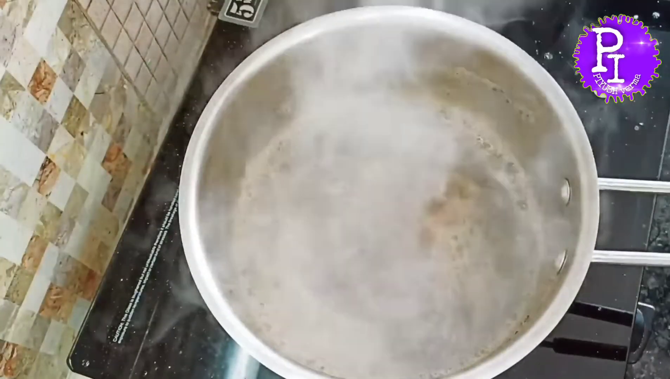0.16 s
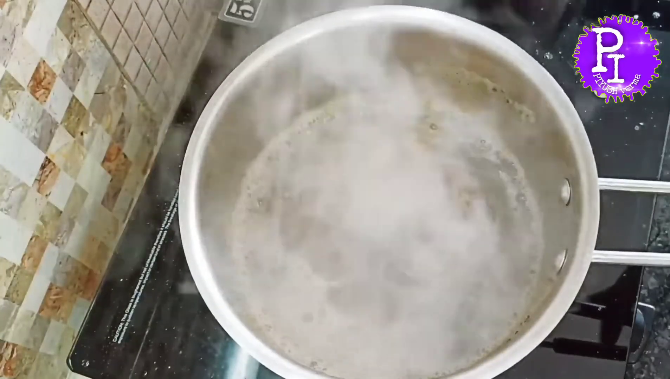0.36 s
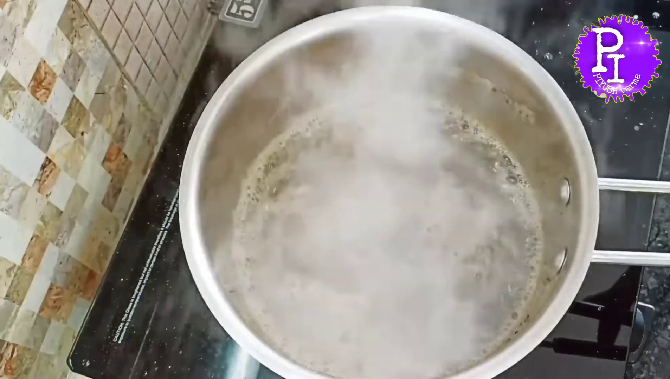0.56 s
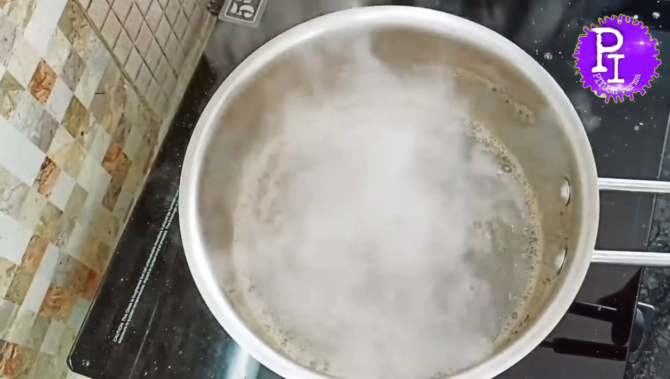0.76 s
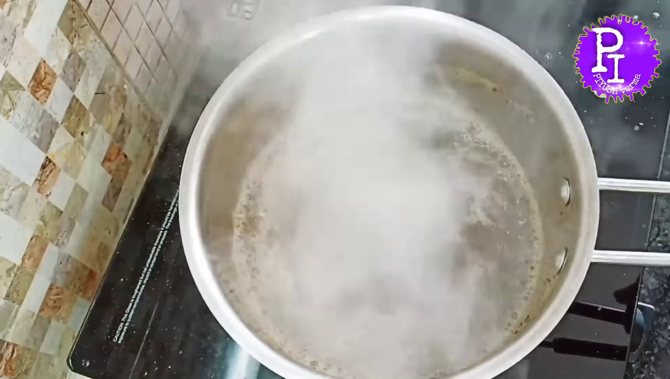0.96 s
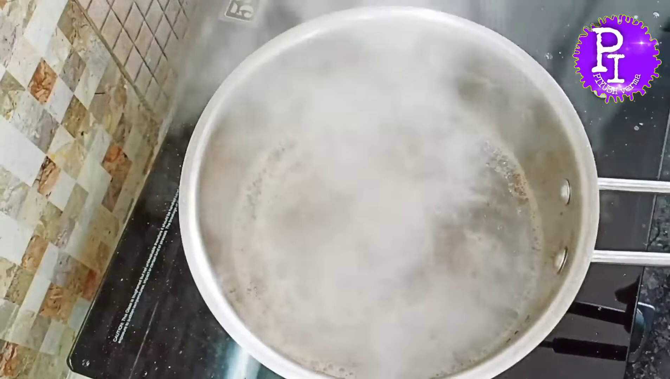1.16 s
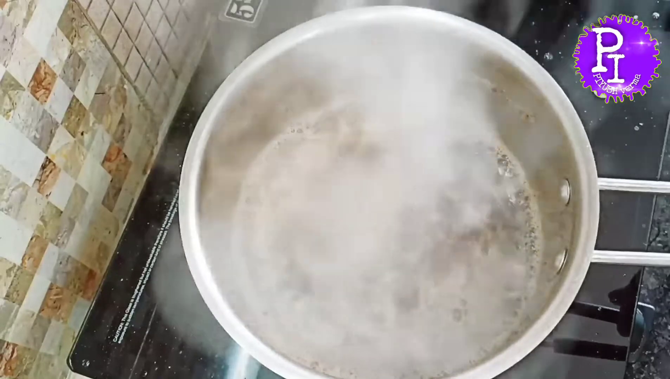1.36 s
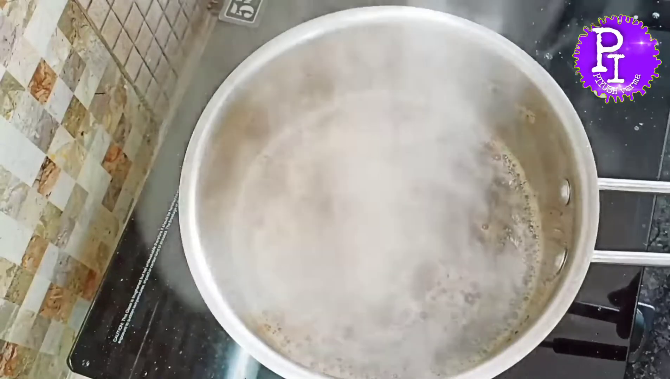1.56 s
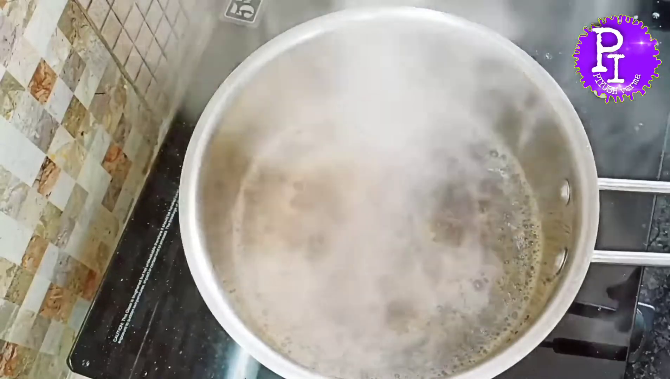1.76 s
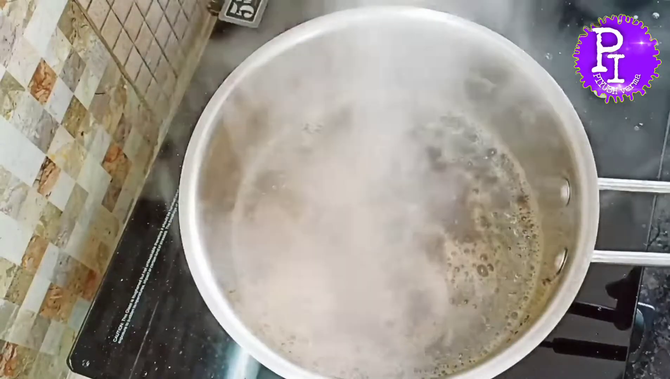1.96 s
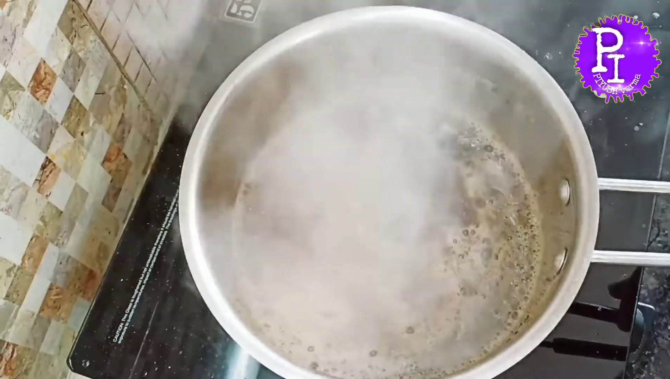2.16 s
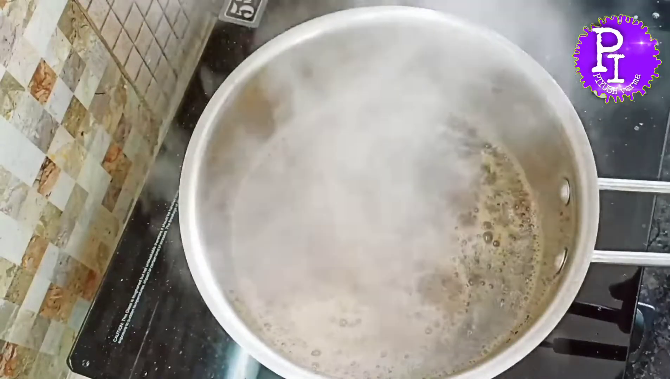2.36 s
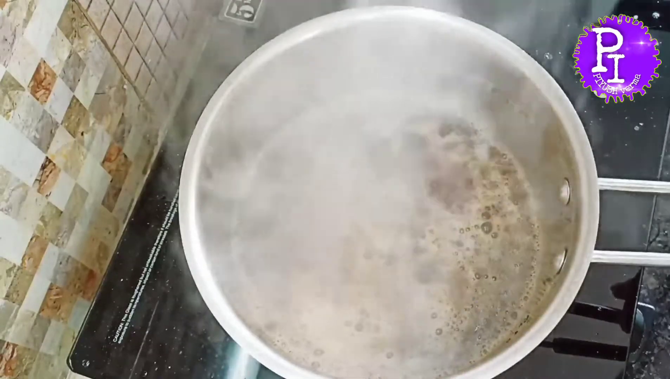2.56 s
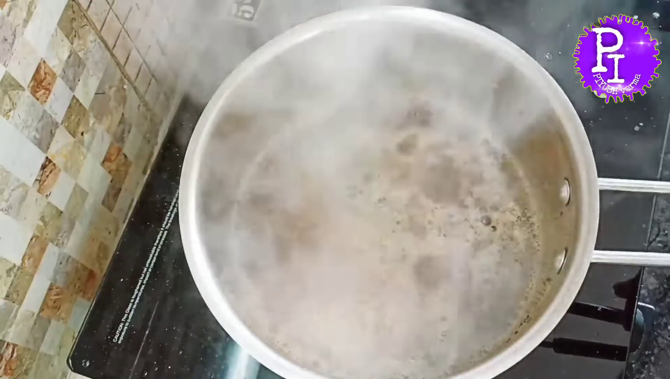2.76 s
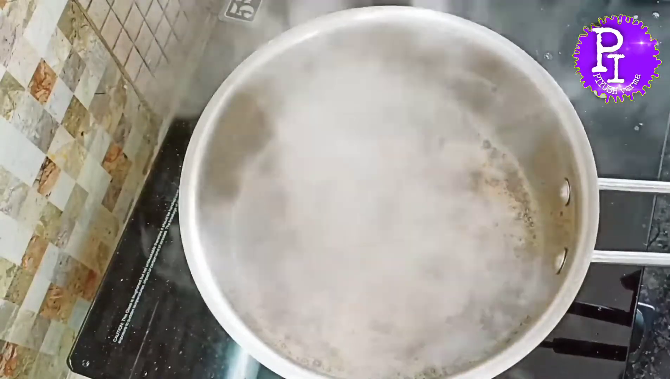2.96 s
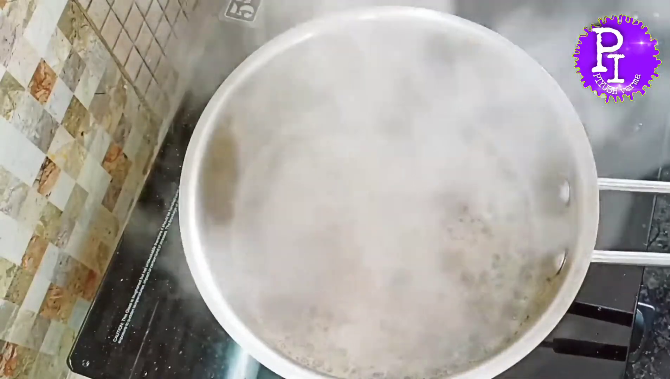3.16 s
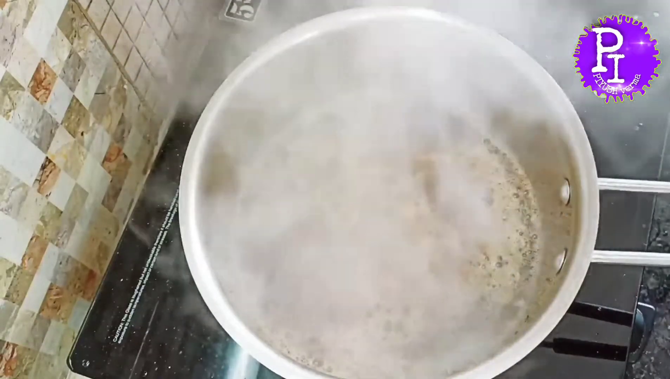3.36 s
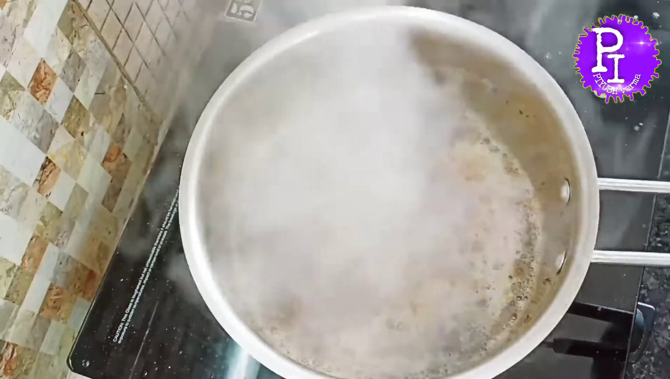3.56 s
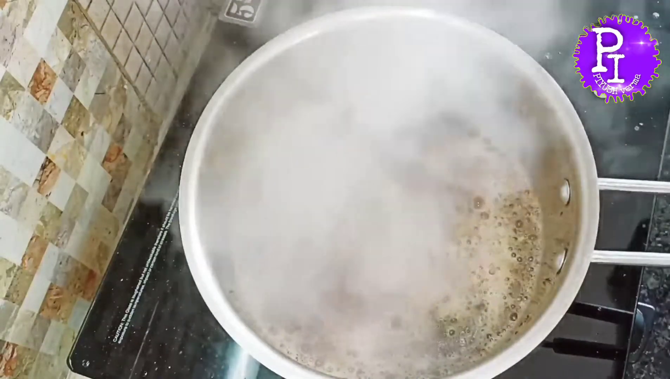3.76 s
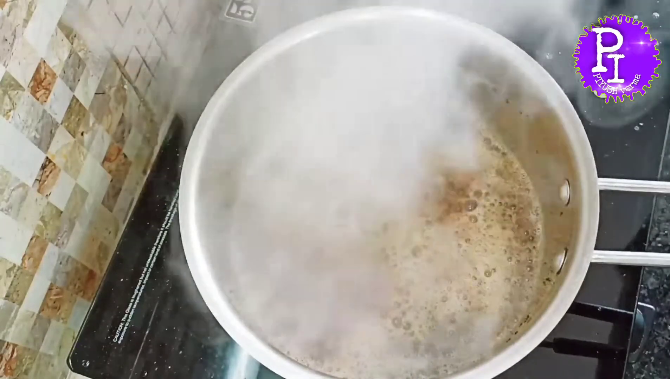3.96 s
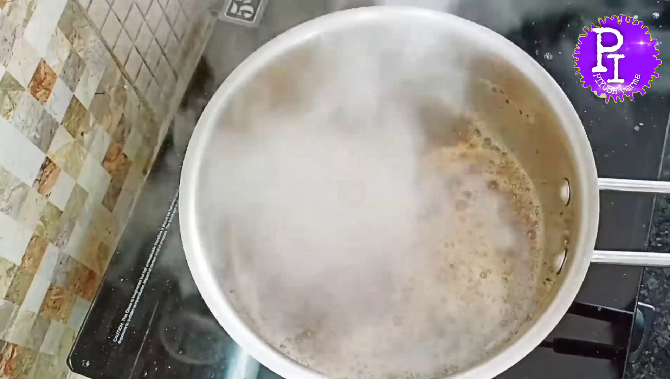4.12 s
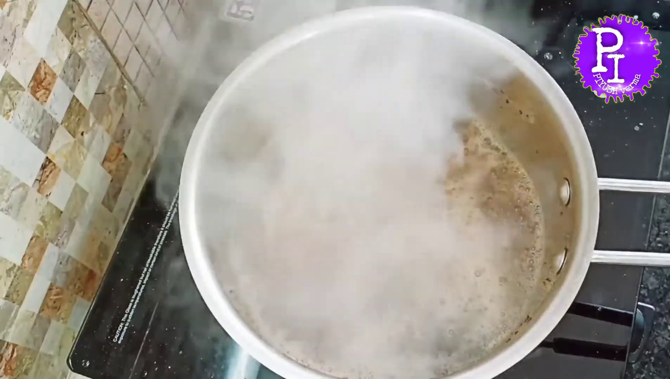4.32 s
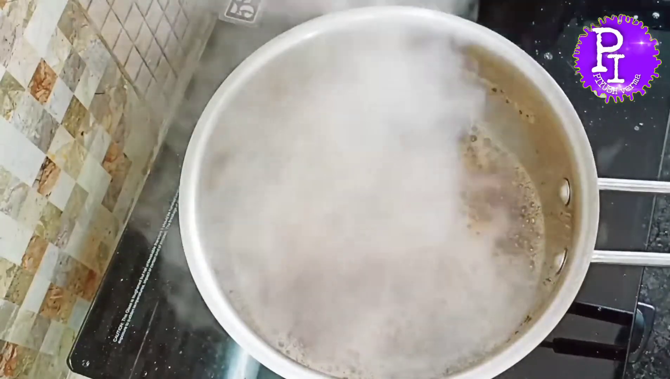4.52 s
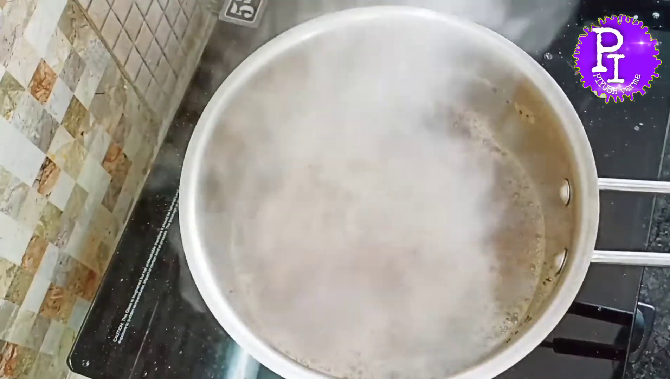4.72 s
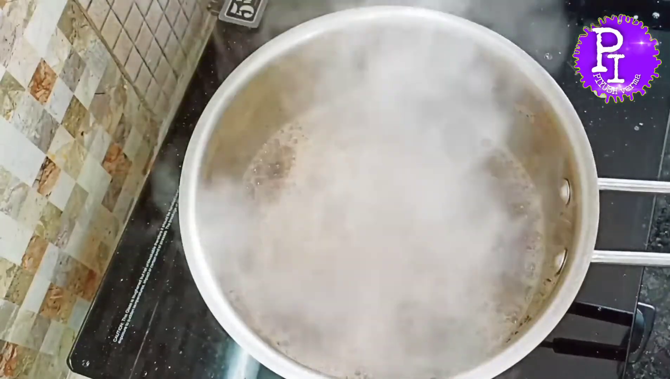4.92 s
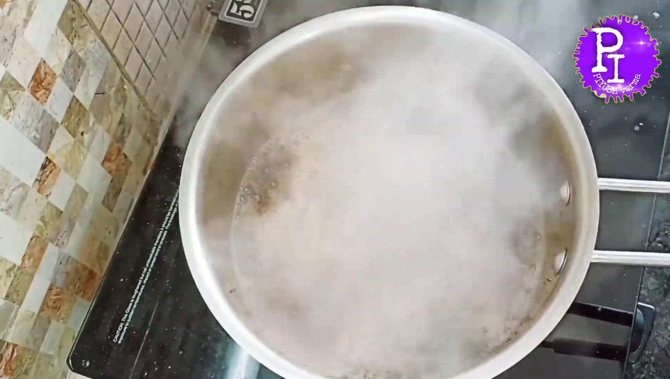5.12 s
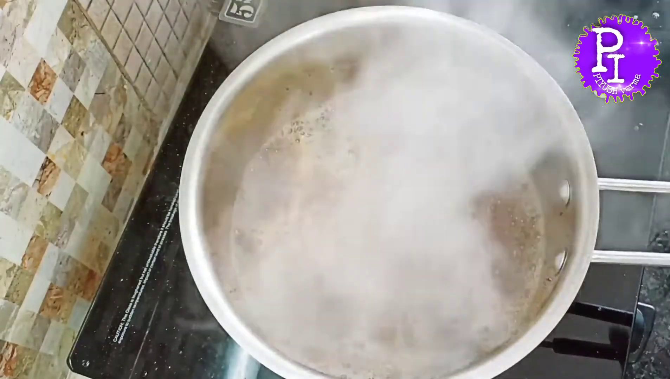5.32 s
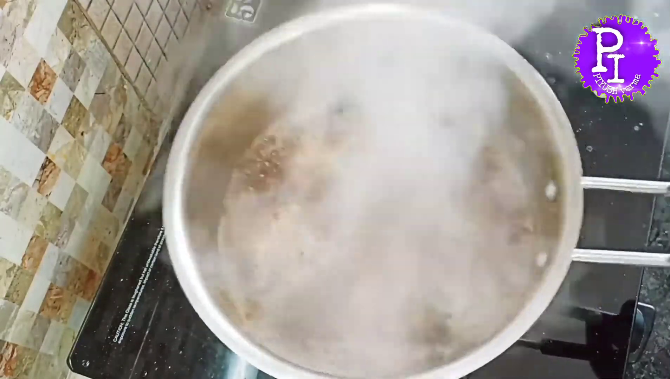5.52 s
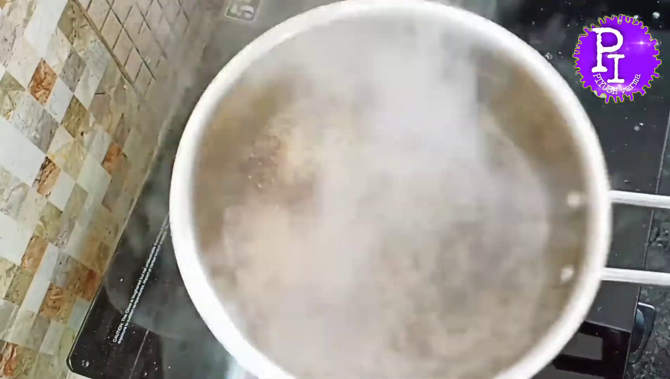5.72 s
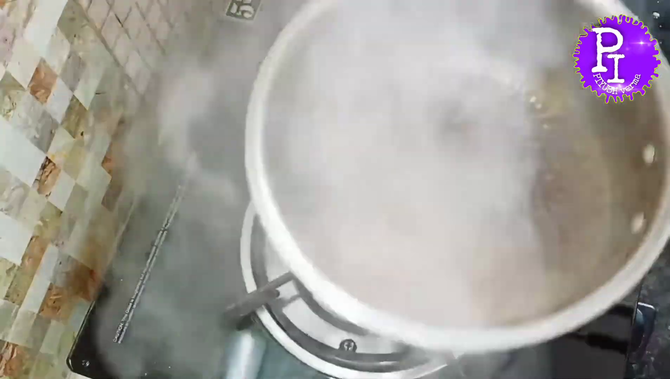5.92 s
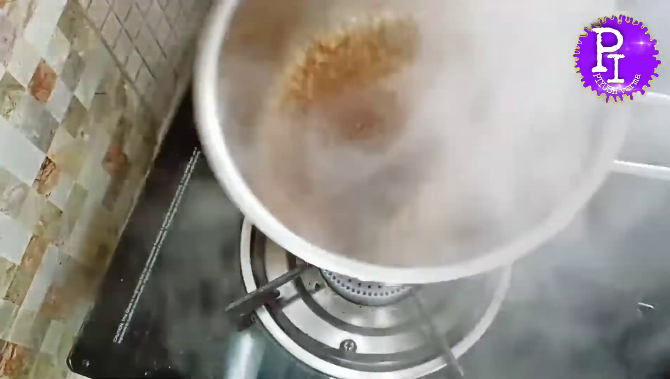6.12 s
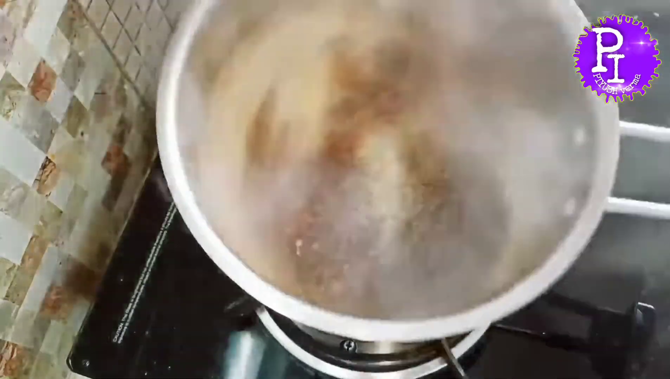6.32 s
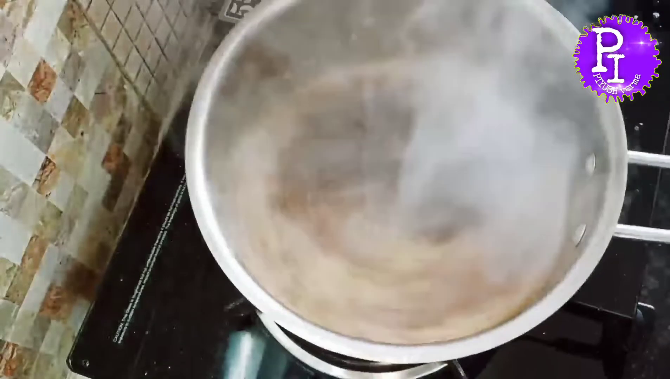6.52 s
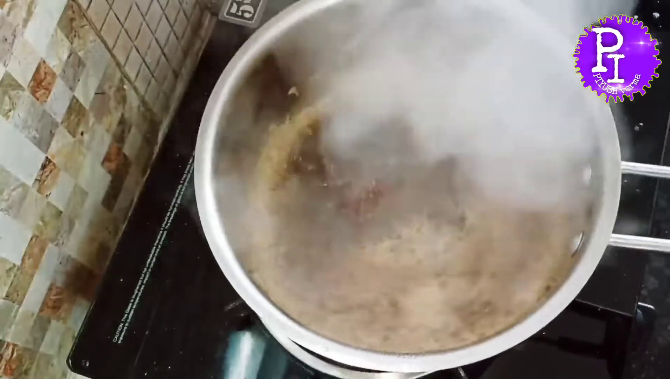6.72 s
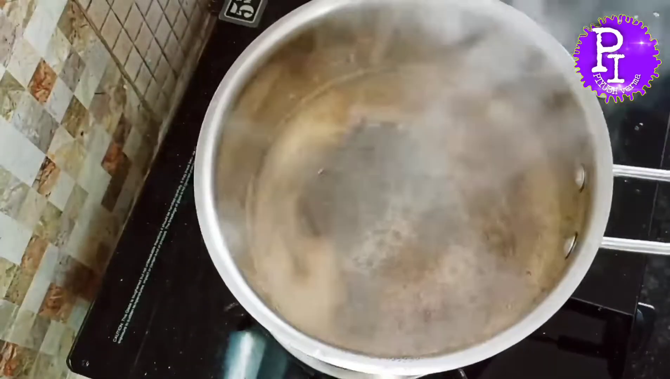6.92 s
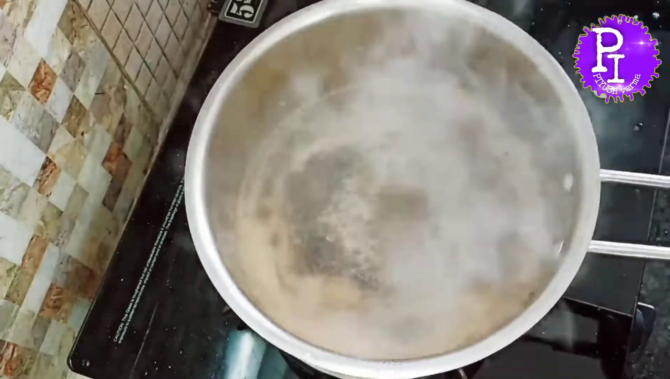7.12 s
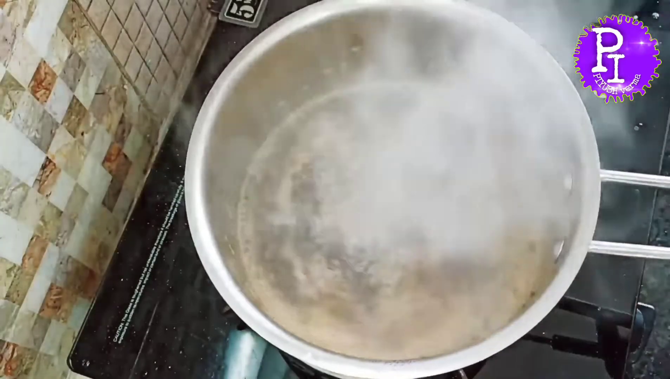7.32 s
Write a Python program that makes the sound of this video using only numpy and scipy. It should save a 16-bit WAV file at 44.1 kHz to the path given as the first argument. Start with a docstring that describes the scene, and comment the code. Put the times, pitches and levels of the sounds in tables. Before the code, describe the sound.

Water boils hard in a steel pan, a steady fizz of tiny pops over larger bubbles, with the low rush of a gas flame and a fan humming underneath. Faint traffic, bird chirps and a distant double horn toot come from outside. Near the end the pan clanks twice on the grate and the water briefly sizzles against its hot wall. The microphone is above the stove in a tiled kitchen.

```python
"""Water boils hard in a steel pan: tiny foam pops fizz over larger bubbles, and stray droplets spit.
Late on, the pan is lifted and clanks twice on the grate, ringing the steel and thudding the stove,
then the water sizzles as it swirls up the hot wall. The tiled kitchen gives the clanks a short tail.
Underneath sits a bed of rushing gas flame and extractor fan hum. Outside, a vehicle drones past,
a bird chirps faintly and a far horn gives a double toot."""
import sys
import numpy as np
from scipy import signal
from scipy.fft import rfft, irfft, next_fast_len
from scipy.io import wavfile
from scipy.ndimage import map_coordinates

SR = 44100
rng = np.random.default_rng(int(sys.argv[2]) if len(sys.argv) > 2 else 0)


def store_wav(level_fs):
    """Save 16-bit WAV to argv[1]."""
    pcm = np.round(np.clip(np.atleast_2d(level_fs), -1, 1) * 32767)
    wavfile.write(sys.argv[1], SR, pcm.T.astype(np.int16))


N = 330000
TIME = np.arange(N) / SR

# how hard the water boils; it dies down off the flame: (time [s], level [dB])
BOIL_VIGOUR = [(0.1, -51.5), (0.8, -49.5), (1.05, -47), (1.4, -48.5), (4, -45), (6.0, -45.5), (6.4, -43.5),
               (6.9, -45.5), (7.25, -49.5)]
# the water's colours: (frequency [Hz], relative level [dB])
FIZZ_EQ = [(1300, -29), (2200, -8.5), (2800, -0.5), (3400, -1.5), (3900, 0.5), (4300, -1), (6700, -3),
           (7300, 2), (8000, 0.5), (9000, -7), (10200, -12), (12400, -10.5), (14800, -3), (15600, -9)]  # bursting foam
BUBBLING_EQ = [(500, -20), (800, -0.5), (1070, 1.5), (1200, -0.5), (1500, -3.5), (1800, -1), (2150, -2),
               (2700, -3.5), (4000, -25)]  # larger bubbles
HOLLOW_EQ = [(1000, -30), (1300, -6), (1440, 2), (1600, -1), (1800, -7), (2200, -27)]  # the air in the pan
SIZZLE_EQ = [(1200, -3.5), (2500, -7.5), (4000, -2.5), (6000, -0.5), (7800, 3), (10000, -9.5), (12500, -10),
             (15000, -0.5)]  # water on the hot wall
# droplets spit on hot steel: (time [s], relative level [dB])
SPIT_CUES = [(0.168, -35), (1.0094, -33), (1.0419, -27.5), (1.0923, -31), (1.9803, -35)]
# the pan strikes the grate: (time [s], gain [dB], thud gain [dB], treble gain [dB])
CLANK_HITS = [(6.1946, -3.5, 8, 8), (6.1963, -2, -0.5, -7), (6.211, -6.5, -13, -5), (6.298, -16.5, -6, -2),
              (6.3204, -1.5, -12, -5.5)]
# ringing modes: (frequency [Hz], relative level [dB], t60 [s])
PAN_MODES = [(255, -13, .07), (565, -25, .16), (609, -25, .22), (665, -28, .22), (704, -29, .2),
             (792, -21, .14), (1033, -36, .14), (830, -12, .032), (1350, -31, .15), (1682, -37, .33),
             (2256, -39, .24), (2433, -40, .24), (2826, -39, .26), (2885, -29, .12), (3942, -31, .14),
             (5227, -33, .06), (5916, -36, .16), (6945, -20, .035), (7500, -30, .06), (9055, -41, .1)]  # the pan with its water
STOVE_MODES = [(107, -34, .3), (160, -26.5, .4), (241, -26, .2), (308, -21, .16), (362, -26, .2),
               (440, -12.5, .1), (502, -27, .18)]  # the stove under the grate
# noise colours: (frequency [Hz], relative level [dB])
CLATTER_EQ = [(60, -30), (150, -11), (240, 0.5), (550, -3), (830, 0), (1020, -2.5), (1200, -8.5),
              (2200, -9.5), (3000, -11), (3400, -16), (3900, -8.5), (5400, -18.5), (6400, -19.5),
              (7200, -15.5), (9300, -22.5), (10500, -38), (16000, -40)]  # the dense ring of steel, water and grate
FLAME_EQ = [(20, -23), (50, -9), (75, 0.5), (105, 8), (128, 4.5), (155, 8.5), (190, -0.5), (225, -1.5),
            (520, -4), (610, 0.5), (645, -5), (700, 2), (830, -10), (1200, -18.5), (2500, -27.5),
            (9000, -28)]  # the flame's low rush
JET_EQ = [(2000, -18), (5000, -5), (6700, -8), (7500, 1), (8300, -5.5), (10000, -11.5), (12400, -9),
          (14800, -2), (15600, -4)]  # the gas jet's hiss
RASP_EQ = [(2400, -25), (2750, -8), (2900, -10), (3080, 0), (3200, -5), (3330, -12), (3520, -4),
           (3900, -25)]  # the buzz of the horn's diaphragm
# the fan's clear overtones: (multiple of the shaft rate, level [dB])
FAN_TONES = [(9, -58), (10, -59), (13, -57), (23, -60), (27, -65.5), (33, -60), (37, -60.5), (45, -60),
             (46, -63), (52, -73), (55, -68.5)]
# the contour of its weaker shaft tones: (frequency [Hz], level per tone [dB])
FAN_WHIRR = [(60, -77), (130, -62), (190, -66), (235, -87), (275, -58.5), (320, -74.5), (365, -65),
             (570, -70.5), (700, -74), (1100, -81.5)]
# the vehicle opens its throttle: (start [s], length [s], level [dB])
THROTTLE_BURSTS = [(3.31, .34, -50), (3.88, .6, -56), (4.62, 0.28, -49), (5.1, 0.57, -43.5),
                   (5.82, 1.2, -48)]
# a short toot and a longer one: (start [s], length [s], level [dB])
HORN_TOOTS = [(4.775, 0.12, -44), (4.912, 0.14, -40)]
# the horn's partials: (multiple of its pitch, relative level [dB])
HORN_PARTIALS = [(7, -12), (8, 0), (9, -10)]
# the bird's calls: (midpoint [s], length [s], pitch [Hz], relative level [dB])
BIRD_CHIRPS = [(2.99, 0.087, 3000, -58), (3.254, 0.17, 2980, -59), (3.44, .05, 2980, -54),
               (3.503, 0.042, 3000, -56), (3.729, 0.107, 2990, -56), (3.98, 0.124, 2990, -56),
               (4.23, 0.08, 2950, -52.5), (4.35, 0.048, 2980, -58)]
# the tiled room's reverb time: (frequency [Hz], t60 [s])
KITCHEN_DECAY = [(150, 0.44), (700, 0.48), (2000, 0.57), (5000, 0.37), (12000, 0.31)]


def boil():
    """Foam bursts in countless tiny pops over larger bubbles; swirled water sizzles on the hot wall."""
    vigour_db = np.interp(TIME, *np.transpose(BOIL_VIGOUR))
    foam = reflections(noise() + amp(-6.5) * bubbles(2500, 5270, 18400, cycles=1.2, spread_db=2.5))
    body = reflections(noise() + amp(-11) * bubbles(500, 796, 3040, cycles=5.1, spread_db=0, size=400))
    spray = noise() + amp(-14) * bubbles(3000, 3000, 15000, cycles=1.87, spread_db=6)
    fizz = amp(vigour_db + 0.23 * wobble(12)) * coloured(foam, FIZZ_EQ)
    bubbling = amp(vigour_db - 10 + 0.96 * wobble(5.9)) * coloured(body, BUBBLING_EQ)
    # the air above the water rings with the bursts, growing with the boil up to a ceiling
    ceiling_db, full_vigour_db = -58, -47.5
    hollow_db = ceiling_db + 1.7 * np.minimum(vigour_db - full_vigour_db, 0)
    hollow = amp(hollow_db + 1.1 * wobble(10)) * coloured(reflections(noise()), HOLLOW_EQ)
    sizzle = amp(-38.5) * swell(crest_s=6.745, width_s=0.35) * coloured(spray, SIZZLE_EQ)
    return fizz + bubbling + hollow + sizzle


def bubbles(per_second, low_hz, high_hz, cycles, spread_db, size=64):
    """A cloud of bubbles at rms 1: each is a damped sine, size samples long, that bends up in pitch."""
    when, pitch, strength = rng.random((int(per_second * N / SR), 3)).T[:, :, None]
    turns = low_hz * (high_hz / low_hz) ** pitch * np.arange(size) / SR
    age = np.minimum(turns / cycles, 2 * np.pi)
    gain = amp(spread_db * np.minimum(-np.log(1 - strength), 2 * np.pi))
    pops = gain * np.exp(-age) * np.sin(2 * np.pi * turns * (1 + 0.019 * age))
    positions = (when * N).astype(int) + np.arange(size)
    return unit(np.bincount(positions.ravel(), pops.ravel(), N)[:N])


def spits():
    """Single droplets crack on the pan's wall, bright and very short."""
    out, t = np.zeros(N), np.arange(SR // 100) / SR
    for start, db in SPIT_CUES:
        crack = coloured(noise(len(t)), [(3000, -20), (7500, -3), (11000, -8), (14500, 4)])
        add(out, start + .001, decay(t, db - 2, t60=.006) * crack)
    return out


def clanks():
    """Each contact with the grate cracks and clatters, rings the pan and thuds the stove."""
    out, t = np.zeros(N), np.arange(SR // 2) / SR
    attack = 1 - np.exp(-t / 0.00045)
    crack_and_tail = decay(t, -12.5, t60=.027) + decay(t, -18.3, t60=.21)
    for start, db, thud_db, treble_db in CLANK_HITS:
        clatter = coloured(noise(len(t)), CLATTER_EQ) * crack_and_tail
        hit = clatter + amp(1) * ring(PAN_MODES, t) + amp(thud_db) * ring(STOVE_MODES, t)
        # each contact has its own brightness; the first crack is the sharpest
        hit = filtered(hit, lambda hz: amp(along([(2200, 0.011), (6000, treble_db)], hz)))
        add(out, start, amp(db) * hit * attack)
    # the clanks carry no deep bass
    return signal.sosfilt(signal.butter(4, 80, "highpass", fs=SR, output="sos"), out)


def ring(modes, t):
    """Struck metal: damped modes, rebalanced a little on each hit; neighbours swing in opposite phase."""
    hz, db, t60 = np.transpose(modes)[:, :, None]
    partials = decay(t, db + rng.normal(0, 1, hz.shape), t60) * np.sin(2 * np.pi * hz * t)
    return partials[::2].sum(0) - partials[1::2].sum(0)


def burner():
    """The low, even rush of the flame and the thin, fluttering hiss of the gas jet."""
    flame = amp(-44.5 + 0.42 * wobble(7)) * coloured(noise(), FLAME_EQ)
    jet = amp(-51 + 0.36 * wobble(5.1) + 0.68 * wobble(25)) * coloured(reflections(noise()), JET_EQ)
    return flame + jet


def fan():
    """A blade hum that sways once a turn, as the rotor runs off centre, over a whirr of shaft tones."""
    shaft_hz, blade_count = 11.092, 15
    angle = 2 * np.pi * np.cumsum(shaft_hz * (1 + 0.00059 * wobble(1.993))) / SR
    hum = amp(-42.5) * (1 + 0.12 * np.cos(angle)) * np.sin(blade_count * angle + 0.67 * np.sin(angle))
    orders = np.arange(6, 100)
    levels_db = along(FAN_WHIRR, orders * shaft_hz) + 1.5 * noise(len(orders))
    for order, db in FAN_TONES:
        levels_db[orders == round(order)] = db
    # one turn of the shaft, looped as a wavetable
    turn = np.linspace(0, 2 * np.pi, 4096)
    phases = 2 * np.pi * rng.random((len(orders), 1))
    wavetable = amp(levels_db) @ np.sin(np.outer(orders, turn) + phases)
    whirr = np.interp(angle % (2 * np.pi), turn, wavetable)
    return np.sqrt(2) * (hum + whirr)


def traffic():
    """Only each engine's lowest tone gets through the walls: one swells past, one pulls away in bursts."""
    idle_hz, cruise_hz, pull_away_s, gather_s = 76.2, 86, 3.4, 1.35
    firing_hz = cruise_hz - (cruise_hz - idle_hz) * np.exp(-np.maximum(TIME - pull_away_s, 0) / gather_s)
    throttle = held(THROTTLE_BURSTS, attack_s=0.067, t60=1)
    pass_s, rise_hz_per_s = .92, 10
    drone = amp(-41.5) * swell(pass_s, width_s=0.41)
    drone_hz = 149 + rise_hz_per_s * (TIME - pass_s)
    return sum(gain * amp(1.7 * wobble(14)) * tone(hz * (1 + 0.019 * wobble(17)))
               for gain, hz in [(throttle, firing_hz), (drone, drone_hz)])


def horn():
    """A far, raspy horn: only three fluttering partials at its diaphragm's resonance carry."""
    pitch_hz = 394 * (1 + .002 * wobble(45))
    direct = held(HORN_TOOTS, attack_s=0.032, t60=.2)
    echo = amp(-7) * held(HORN_TOOTS, attack_s=0.128, t60=1)  # house fronts scatter the horn
    out = amp(-16) * (direct + echo) * coloured(noise(), RASP_EQ)
    for order, db in HORN_PARTIALS:
        hz = round(order) * pitch_hz
        flutter = amp(2.2 * wobble(22) + 1.2 * wobble(90))
        blurred = unit(wobble(70) * tone(hz) + wobble(70) * tone(hz))
        out += amp(db) * (direct * flutter * tone(hz) + echo * blurred)
    return out


def bird():
    """Short, slightly falling whistles, blurred by distance."""
    out = np.zeros(N)
    waver, flutter = wobble(120), wobble(60)
    for midpoint, length, hz, db in BIRD_CHIRPS:
        progress = np.clip((TIME - midpoint) / length, -1, 1)
        fade = np.cos(np.pi * progress / 2) ** 2
        out += amp(db) * fade * tone(hz * (1 - 0.0092 * progress + 0.0071 * waver))
    return out * amp(2.6 * flutter - 2)


def reflections(x, count=12):
    """Weak echoes off the pan's sides and the tiles lightly comb-filter a steady sound; rms 1."""
    out = x.copy()
    for delay_s, gain in zip(rng.uniform(.0008, .016, count), rng.choice([-.075, .075], count)):
        add(out, delay_s, gain * x)
    return unit(out)


def kitchen_reverb(x, predelay_s=0.0092):
    """The tiled room's short tail; the treble dies first."""
    hz, t, spectrum = signal.stft(noise(SR * 3 // 4), SR, nperseg=256)
    fade = decay(t, 0, t60=along(KITCHEN_DECAY, hz)[:, None])
    _, tail = signal.istft(spectrum * fade, SR, nperseg=256)
    tail = np.pad(tail, (round(predelay_s * SR), 0))
    return signal.fftconvolve(x, tail / np.linalg.norm(tail))[:N]


def amp(db):
    """Decibels to gain."""
    return 10 ** (np.asarray(db) / 20)


def unit(x):
    """x at rms 1."""
    return x / np.sqrt(np.mean(x ** 2) + 1e-20)


def noise(size=N):
    """White noise."""
    return rng.standard_normal(size)


def tone(hz):
    """A sine of rms 1 that follows a pitch curve."""
    return np.sqrt(2) * np.sin(2 * np.pi * (np.cumsum(hz * np.ones(N)) / SR + rng.random()))


def wobble(rate):
    """A smooth random modulator, rate knots a second."""
    steps = TIME[::64]
    knots = noise(int(N * rate / SR) + 4)
    return np.interp(TIME, steps, map_coordinates(knots, [steps * rate]))


def decay(t, db, t60):
    """An envelope that starts at db and falls 60 dB every t60 seconds."""
    return amp(db - 60 * t / t60)


def swell(crest_s, width_s):
    """A bell-shaped envelope; the width is taken at half height."""
    return .5 ** ((2 * (TIME - crest_s) / width_s) ** 2)


def held(cues, attack_s, t60):
    """An attack, hold and release envelope for (start [s], length [s], level [dB]) cues."""
    return sum(np.clip((TIME - start) / attack_s, 0, 1)
               * decay(np.maximum(TIME - start - length, 0), db, t60) for start, length, db in cues)


def along(points, hz):
    """Read (frequency [Hz], value) points on a log axis."""
    point_hz, values = np.transpose(points)
    return np.interp(np.log(hz + 1), np.log(point_hz + 1), values)


def filtered(x, response):
    """x through a filter whose gain is response(hz)."""
    size = next_fast_len(len(x) + 8192)
    return irfft(rfft(x, size) * response(np.fft.rfftfreq(size, 1 / SR)), size)[:len(x)]


def coloured(x, eq):
    """x through an EQ curve, at rms 1."""
    return unit(filtered(x, lambda hz: amp(along(eq, hz))))


def add(track, start_s, sound):
    """Mix a sound into the track at start_s."""
    part = track[round(start_s * SR):][:len(sound)]
    part += sound[:len(part)]


def scene():
    """A mono mix, heard from above the stove; only the clanks feed the reverb."""
    pan = clanks()
    mono = boil() + spits() + pan + burner() + fan() + traffic() + horn() + bird()
    mono += amp(-9.5) * kitchen_reverb(pan)
    return np.array([mono, mono])


def record(dry):
    """A soft clip rounds off the highest peaks, then a brick-wall low-pass trims the top."""
    ceiling, cutoff_hz = .92, 15600
    rounded = dry / (1 + np.abs(dry / ceiling) ** 6) ** (1 / 6)
    return np.array([filtered(channel, lambda hz: hz < cutoff_hz) for channel in rounded])


dry = scene()
out = record(dry)
store_wav(out)
```